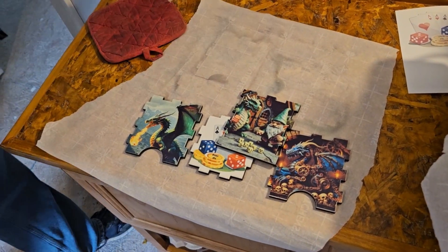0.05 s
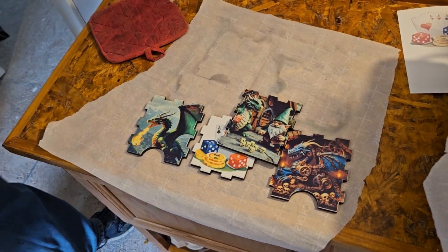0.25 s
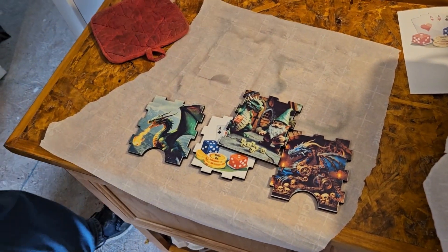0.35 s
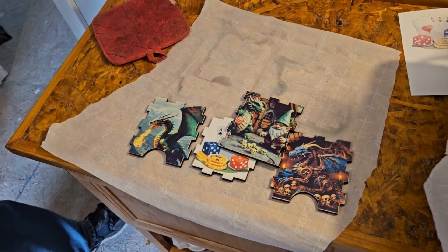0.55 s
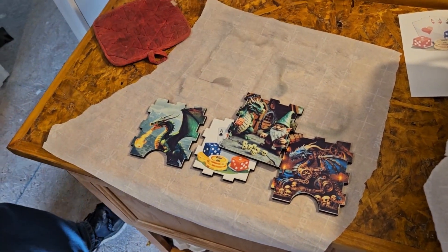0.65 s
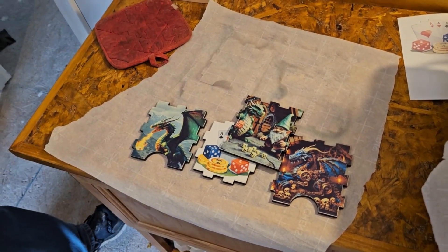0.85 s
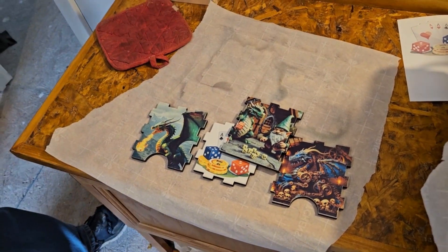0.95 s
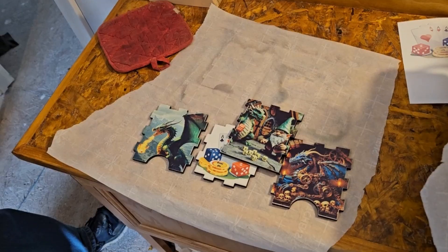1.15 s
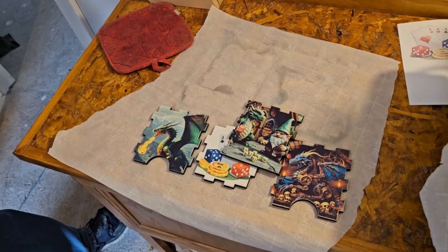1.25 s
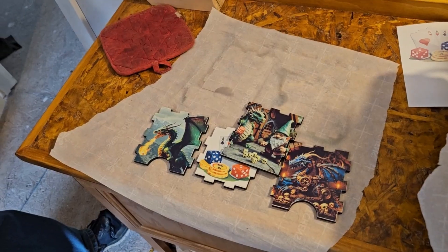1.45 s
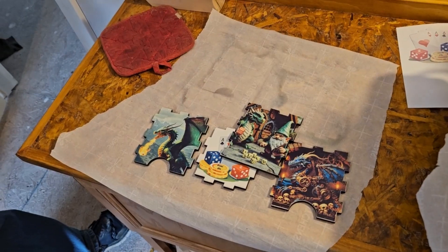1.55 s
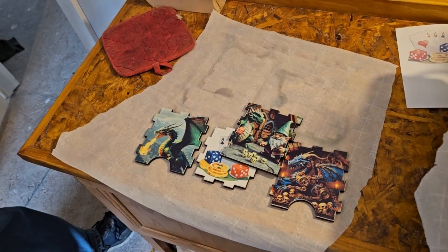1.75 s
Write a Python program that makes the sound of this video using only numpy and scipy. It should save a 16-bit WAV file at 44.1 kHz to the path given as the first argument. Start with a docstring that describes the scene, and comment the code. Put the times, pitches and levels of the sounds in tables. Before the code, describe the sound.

Small flat wooden pieces knock together and slide over paper, first in a busy clatter, then with a dull knock and a few faint ticks; close stereo pickup, short room echo, low rumble and soft hush.

```python
"""At a paper-covered bench in a small workshop, thin plywood puzzle pieces are picked up and shuffled.
A steady hush and a low rumble lie behind soft bumps of filtered noise and one dull knock.
Sliding pieces are made of many tiny random slips plus smooth noise, coloured as wood, edge and paper.
Each click is a burst of chatter with a short clack and fading tones of piece and bench;
one piece is set down with a hollow tap."""
import sys
import numpy as np
from scipy import signal
from scipy.fft import rfft, irfft, next_fast_len
from scipy.io import wavfile

SR = 44100
rng = np.random.default_rng(int(sys.argv[2]) if len(sys.argv) > 2 else 0)


def pcm_store(signal):
    """Save signal as 16-bit PCM."""
    levels = np.round(np.clip(np.atleast_2d(signal), -1, 1) * 32767)
    wavfile.write(sys.argv[1], SR, levels.astype(np.int16).T)


N = 79380  # length of the scene in samples


def amp(db):
    """Turn decibels into a gain; -60 dB is a thousandth."""
    return 10 ** (np.asarray(db) / 20)


def unit(x):
    """Scale a signal to an rms (average strength) of 1."""
    return x / np.sqrt(np.mean(x ** 2) + 1e-20)


def along(points, hz):
    """Read a curve of (frequency, value) points, with straight lines on a log frequency axis."""
    point_hz, value = np.transpose(points)
    return np.interp(np.log(hz + 1), np.log(point_hz + 1), value)


def filtered(x, response):
    """Multiply the spectrum of x by a response, which is a function of frequency."""
    n = x.shape[-1]
    size = next_fast_len(n + SR // 4)  # spare room at the end for the filter to ring out
    spectrum = rfft(x, size) * response(np.fft.rfftfreq(size, 1 / SR))
    return irfft(spectrum, size)[..., :n]


def colour(points, size=1024):
    """Make a short filter of energy 1 with the given spectrum, which never answers before its input."""
    log_gain = np.log(amp(along(points, np.fft.rfftfreq(size, 1 / SR))))
    cepstrum = irfft(log_gain)
    # folding the second half onto the first puts the energy as early as possible
    cepstrum[1:size // 2] *= 2
    cepstrum[size // 2 + 1:] = 0
    h = irfft(np.exp(rfft(cepstrum)))
    return h / np.linalg.norm(h)


def through(x, h):
    """Send each channel through the filter h, keeping the length."""
    return signal.fftconvolve(np.atleast_2d(x), np.atleast_2d(h), axes=1)[:, :x.shape[-1]]


def spread(pair):
    """Mix two unrelated signals into a left and right that are more alike in the bass than in the treble."""
    # how alike left and right are: (frequency [Hz], likeness [0 to 1])
    likeness = [(60, 0.9), (250, 0.94), (600, 0.47), (1500, 0.22), (4000, 0.17), (12000, 0.2)]

    def middle_and_side(hz):
        angle = np.arccos(np.clip(along(likeness, hz), -1, 1)) / 2
        return np.array([np.cos(angle), np.sin(angle)])

    mid, side = filtered(pair, middle_and_side)
    return np.array([mid + side, mid - side])


def workshop():
    """A newly drawn echo of the place: direct sound, dense answers of the bench and a short room tail."""
    # how long the room tail takes to fall by 60 dB: (frequency [Hz], time [s])
    decay_times = [(100, 0.54), (600, 0.41), (2000, 0.43), (6000, 0.36), (14000, 0.28)]
    tail_db, near_db = -6.5, -2.5  # energy in each channel against the direct sound
    near_t60_s, buildup_s = 0.044, 0.0037
    t = np.arange(SR // 3) / SR

    # every frequency of the tail fades at its own speed
    hz, frame_s, noise = signal.stft(rng.standard_normal((2, len(t))), SR, nperseg=256)
    fading = noise * amp(-60 * frame_s / along(decay_times, hz)[:, None])
    tail = signal.istft(fading, SR, nperseg=256)[1][:, :len(t)]

    near = rng.standard_normal((2, len(t))) * amp(-60 * t / near_t60_s)
    arrive = 1 - np.exp(-(t / buildup_s) ** 2)
    echoes = amp(tail_db) * unit(tail * arrive) + amp(near_db) * unit(near * arrive)
    h = spread(echoes) / np.sqrt(len(t))
    h[:, 0] += 1  # the direct sound
    return h


def air():
    """The steady hush and rumble of the room, both made of noise with a fixed spectrum."""
    # spectrum shape of the hush: (frequency [Hz], relative level [dB])
    hush = [(30, -27), (300, -10.5), (800, -9), (2000, -5), (4000, -8), (5500, -35), (7500, -9),
            (9800, -42), (12500, -13), (16000, -41)]
    # spectrum shape of the deep rumble: (frequency [Hz], relative level [dB])
    rumble = [(20, -24), (35, 1), (52, 10), (75, 4), (110, -7.5), (300, -5), (700, -6), (2000, -19.5)]
    hush_db, rumble_db = -57.5, -65

    def steady(spectrum):
        """Shaped stereo noise at rms 1."""
        noise = spread(rng.standard_normal((2, N)))
        return unit(filtered(noise, lambda hz: amp(along(spectrum, hz))))

    return amp(hush_db) * steady(hush) + amp(rumble_db) * steady(rumble)


def knock():
    """One dull push that jumps up, swings back and dies out, inside a deep, brief swing."""
    knock_s = 1.3015
    push_db, push_rate_hz = -27, 463  # a higher rate makes a shorter push
    swing_db, swing_hz, swing_width_s = -46, 55, 0.04
    t = np.arange(N) / SR - knock_s
    u = 2 * np.pi * push_rate_hz * np.maximum(t, 0)
    push = amp(push_db) * 2 * u * (2 - u) * np.exp(-u)
    swell = np.exp(-(t / swing_width_s) ** 2)
    swing = amp(swing_db) * swell * np.sin(2 * np.pi * swing_hz * t)
    return push + swing


def bumps():
    """Dull thumps of bench and handling: bands of low noise that swell and die away."""
    # soft bumps: (start [s], level [dB], middle of the band [Hz], rise [s], time to fall by 60 dB [s])
    thumps = [(0.031, -48.5, 262, 0.0024, 0.034), (0.069, -48, 161, 0.013, 0.29),
              (0.196, -47.5, 238, 0.0076, 0.43), (.25, -48.5, 182, 0.0061, .15),
              (.355, -46, 128, 0.013, 0.22), (0.388, -40, 346, 0.011, 0.23),
              (.435, -44.5, 101, 0.016, 0.35), (0.456, -51.5, 286, 0.0087, 0.24),
              (.54, -41, 207, 0.022, 0.42), (.962, -50, 69, 0.0039, 0.1), (1.0, -44.5, 194, 0.017, 0.29),
              (1.254, -55.5, 168, 0.0053, 0.36), (1.482, -54, 173, 0.011, 0.088)]
    width_octaves = 0.66
    out = np.zeros((2, N))
    for start_s, db, pitch_hz, rise_s, t60_s in thumps:
        t = np.arange(N) / SR - start_s
        rise = np.clip(t / rise_s, 0, 1)
        shape = rise * amp(-60 * np.maximum(t - rise_s, 0) / t60_s)

        def band(hz):
            return np.exp(-0.5 * (np.log2((hz + 1) / pitch_hz) / width_octaves) ** 2)

        thump = shape * filtered(rng.standard_normal((2, N)), band)
        out += amp(db) * unit(thump) * np.sqrt(np.mean(shape ** 2))
    return spread(out)


def friction(spectrum):
    """Rubbing at rms 1: tiny slips of uneven size, heard in the workshop, over a smooth rub."""
    slips_per_s, size_spread_db = 600, 2
    slip_share = 0.58  # part of the power that comes from the slips
    happens = rng.random(N) < slips_per_s / SR
    size = amp(size_spread_db * np.minimum(rng.exponential(size=N), 4))
    slips = happens * rng.choice([-1, 1], N) * size
    grainy = unit(through(slips, workshop()))
    smooth = spread(rng.standard_normal((2, N)))
    rub = np.sqrt(slip_share) * grainy + np.sqrt(1 - slip_share) * smooth
    return unit(through(rub, colour(spectrum)))


def slides():
    """Sliding strokes swell and fade: the face scrapes, the edge rasps and the paper hisses."""
    # strokes, levels before the overall trims:
    # (peak [s], rise [s], fall [s], face scrape [dB], edge rasp [dB], paper hiss [dB])
    strokes = [(.11, 0.033, 0.045, -37, -59, -38), (0.21, 0.01, 0.016, -31.5, -64, -46),
               (0.255, 0.024, 0.015, -39.5, -66, -41.5), (0.376, 0.045, 0.026, -37, -43, -40.5),
               (.495, 0.03, 0.02, -44, -37, -37), (0.561, 0.032, 0.11, -38.5, -54, -39.5),
               (0.658, 0.027, 0.017, -46, -31, -63), (0.729, 0.022, 0.026, -48, -34, -47.5),
               (.80, 0.055, 0.12, -45.5, -47.5, -46), (.94, 0.058, .03, -40, -48, -38.5),
               (1.005, 0.055, 0.019, -32, -50, -60), (1.066, 0.026, 0.056, -33, -45, -37.5),
               (1.225, 0.052, 0.069, -38.5, -43, -54), (1.324, 0.014, 0.045, -52, -48.5, -47),
               (1.408, 0.029, 0.016, -41.5, -43, -50), (1.52, 0.061, 0.044, -49, -47, -48.5),
               (1.625, 0.08, 0.068, -45, -44.5, -53.5), (1.697, 0.0052, 0.03, -50, -40, -47.5),
               (1.79, .04, .03, -48, -48.5, -58)]
    # spectrum shape of the scraping face: (frequency [Hz], relative level [dB])
    face = [(150, -47), (500, -13), (1000, -4.5), (1450, 2.5), (2200, 6), (2750, 1), (3600, -5.5),
            (4400, 2), (5500, -5.5), (9000, -16)]
    # spectrum shape of the rasping edge: (frequency [Hz], relative level [dB])
    edge = [(1200, -34), (2400, -9), (3000, -1), (3500, 0.5), (4300, -2), (5200, -16), (9000, -49)]
    # spectrum shape of the hissing paper: (frequency [Hz], relative level [dB])
    paper = [(1500, -2), (4000, -11.5), (5500, -8), (7700, 3.5), (9800, -17.5), (12300, -1), (14500, -21),
             (16300, -33)]
    face_trim_db, edge_trim_db, paper_trim_db = -3, -2.5, -3.5
    face_rest_db, paper_rest_db = -51, -57  # faint rubbing between the strokes, before the trims

    peak_s, rise_s, fall_s, scrape_db, rasp_db, hiss_db = np.transpose(strokes)[:, :, None]
    t = np.arange(N) / SR - peak_s
    swell = np.exp(-(t / np.where(t < 0, rise_s, fall_s)) ** 2)

    def level(db, rest):
        """Add the power of all strokes and of the resting level."""
        return np.sqrt(((amp(db) * swell) ** 2).sum(0) + rest ** 2)

    scrape = amp(face_trim_db) * level(scrape_db, amp(face_rest_db)) * friction(face)
    rasp = amp(edge_trim_db) * level(rasp_db, 0) * friction(edge)
    hiss = amp(paper_trim_db) * level(hiss_db, amp(paper_rest_db)) * friction(paper)
    return scrape + rasp + hiss


def ringing(table, t):
    """Fading tones of a struck object, each struck a little differently every time."""
    scatter_db = 4.5
    hz, mode_db, t60_s = np.transpose(table)[:, :, None]
    strike_db = mode_db + scatter_db * rng.standard_normal(hz.shape)
    sign = rng.choice([-1, 1], hz.shape)
    tones = sign * amp(strike_db - 60 * t / t60_s) * np.sin(2 * np.pi * hz * t)
    return tones.sum(0)


def clicks():
    """Piece hits piece: impact and chatter sound wood, body and crack, then clack, piece and bench ring."""
    # hits, levels before the overall trim; body and crack are relative to the wood part:
    # (time [s], level [dB], hollow body [dB], bright crack [dB], chatter fall by 60 dB [s], clack pitch [Hz])
    hits = [(0.0577, -38.5, 0.5, -8, 0.0055, 1960), (.2105, -23.5, -5.5, -26, 0.0031, 1810),
            (.2560, -25.5, -12, -14.5, 0.014, 1740), (.2590, -32, 0, -10, 0.045, 746),
            (.3385, -21, -10.5, -14.5, 0.017, 5360), (.3820, -30, -7, -7, 0.03, 1900),
            (.3925, -15.5, -8.5, -2, 0.012, 1884), (.4015, -27.5, -4.5, 1, 0.0031, 2100),
            (.4565, -21.5, -14.5, -20, 0.0025, 1670), (.4862, -17.5, -3, -14.5, 0.011, 2070),
            (.5255, -21.5, -4, -13, 0.0056, 1890), (.5425, -25.5, -5.5, -25, 0.013, 1550),
            (.5700, -28.5, -10, -3, 0.012, 2090), (.6040, -22.5, -17, -5, 0.0087, 5430),
            (.6318, -17.5, -29, -7.5, 0.021, 2027), (.7272, -29.5, -28, -1.5, 0.011, 3200),
            (.7700, -22, -10, -11.5, 0.0016, 2100), (.8025, -25, -24, -37, 0.0026, 1350),
            (.8187, -22, -35, -8.5, 0.0076, 1720), (.8552, -12, -20, -4, 0.0035, 1530),
            (.8584, -10.5, -20, -0.5, 0.0046, 1904), (.8703, -17.5, -9.5, -23, 0.014, 1300),
            (.8758, -19.5, -7, -3, 0.0079, 3760), (.9190, -15.5, -14, -21, 0.0019, 2370),
            (.9262, -21.5, -17, -12, 0.015, 1930), (.9560, -26.5, -3.5, -12, 0.018, 1980),
            (.9666, -13, -9.5, -10.5, 0.01, 2400), (.9715, -21.5, 6.5, -12.5, 0.02, 745),
            (1.2938, -36.5, -5, 0.5, 0.03, 1740), (1.3192, -32, -2, -7, 0.004, 3720),
            (1.5160, -30, -9, -1.5, 0.0018, 4030), (1.6876, -32, -16, -11.5, 0.039, 1450)]
    # ringing tones of a thin piece, before random scatter:
    # (frequency [Hz], relative level [dB], time to fall by 60 dB [s])
    piece_modes = [(1194, 1, 0.14), (1399, 5.5, 0.044), (1660, -4, 0.028), (1840, -18, 0.046),
                   (2025, -4, 0.027), (2107, 6.5, 0.074), (2460, 1, 0.051), (3060, 5, 0.038),
                   (3387, 10, 0.029), (3700, -21, .08), (3775, -6.5, 0.18), (4370, 4, 0.058),
                   (4140, 1.5, 0.083), (7300, -51, 0.06)]
    # ringing tones of the bench top, before random scatter:
    # (frequency [Hz], relative level [dB], time to fall by 60 dB [s])
    bench_modes = [(590, 0.5, 0.034), (726, -14, 0.22), (969, 2, 0.19), (1080, 0, 0.055)]
    # spectrum shape of the wood part: (frequency [Hz], relative level [dB])
    wood = [(200, -54), (900, -8.5), (1350, 2.5), (2000, 0), (2700, -6), (3900, -3.5), (5200, -8.5),
            (9000, -24), (16000, -90.5)]
    # spectrum shape of the hollow body: (frequency [Hz], relative level [dB])
    body = [(60, -28.5), (250, -18.5), (480, -10.5), (700, 2), (1050, 3), (1500, -6), (4000, -50.5)]
    # spectrum shape of the bright crack: (frequency [Hz], relative level [dB])
    crack = [(1000, -93), (3500, -13), (5500, -3), (7700, 7), (9800, -7.5), (12300, 3.5), (14500, -7),
             (16500, -29)]
    trim_db, piece_db, bench_db = -1, -25, -24
    strike_db = -9.5  # first impact against the chatter that follows
    clack_db, clack_t60_s = -4, 0.015  # the quickly damped flexing of the struck spot

    out = np.zeros((2, N + SR))
    t = np.arange(SR // 4) / SR
    filters = colour(wood), colour(body), colour(crack)
    norm = np.linalg.norm
    # the clack and the piece's tones keep little below 650 Hz
    low_cut = signal.butter(2, 650, "highpass", fs=SR, output="sos")
    for time_s, db, body_db, crack_db, chatter_t60_s, clack_hz in hits:
        chatter = spread(rng.choice([-1., 1.], (2, len(t))) * amp(-60 * t / chatter_t60_s))
        force = norm(chatter)
        chatter[:, 0] += amp(strike_db) * norm(chatter, axis=1)

        hit = 0
        for part_db, h in zip((0, body_db, crack_db), filters):
            part = through(chatter, h)
            hit = hit + force * amp(part_db) * part / norm(part)

        clack = amp(clack_db - 60 * t / clack_t60_s) * np.sin(2 * np.pi * clack_hz * t)
        piece = signal.sosfilt(low_cut, clack + amp(piece_db) * ringing(piece_modes, t))
        bench = amp(bench_db + body_db) * ringing(bench_modes, t)  # rung with the hollow body

        click = amp(db + trim_db) * through(hit + piece + bench, workshop())
        start = round(time_s * SR)
        out[:, start:start + len(t)] += click
    return out[:, :N]


def scene():
    """Handling reaches the left microphone first but is louder on the right in the middle range."""
    # level of left against right: (frequency [Hz], difference [dB])
    balance = [(300, -3), (700, 2.5), (1200, -6), (1900, -9.5), (3200, -10.5), (5000, -0.5), (7300, 3.5),
               (12500, -1.5)]
    lead_s, lead_from_hz = 0.0005162, 1010  # the left hears the middle and treble earlier
    side = np.array([[.5], [-.5]])  # half of each difference goes to either channel

    def place(hz):
        lead = lead_s * (1 - np.exp(-(hz / lead_from_hz) ** 2))
        return amp(side * along(balance, hz)) * np.exp(2j * np.pi * hz * side * lead)

    handling = bumps() + slides() + clicks()
    return air() + knock() + filtered(handling, place)


def record(dry):
    """A very steep filter leaves next to nothing above its limit."""
    top_hz = 16000
    return filtered(dry, lambda hz: 1 / np.sqrt(1 + (hz / top_hz) ** 160))


dry = scene()
out = record(dry)
pcm_store(out)
```